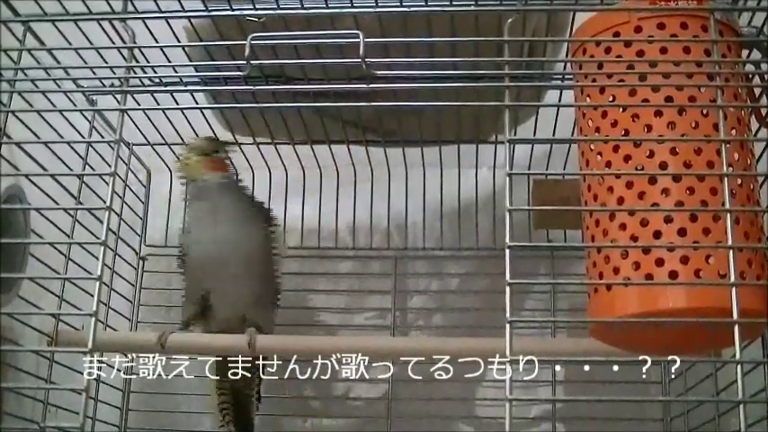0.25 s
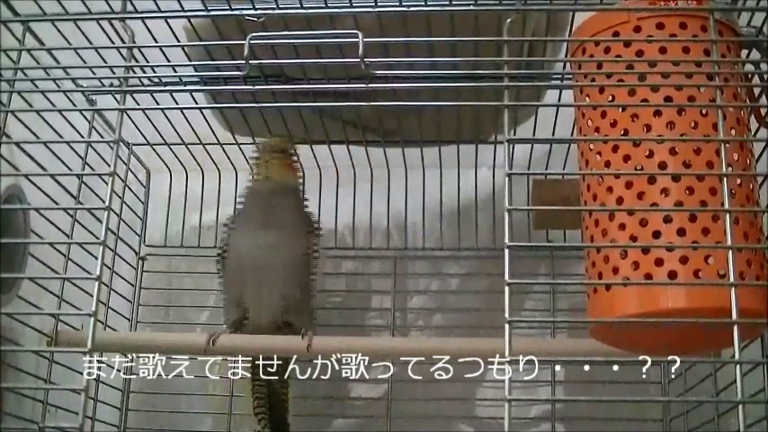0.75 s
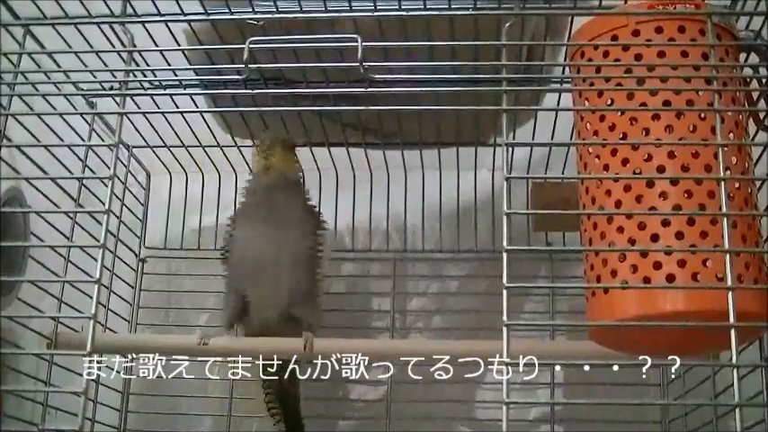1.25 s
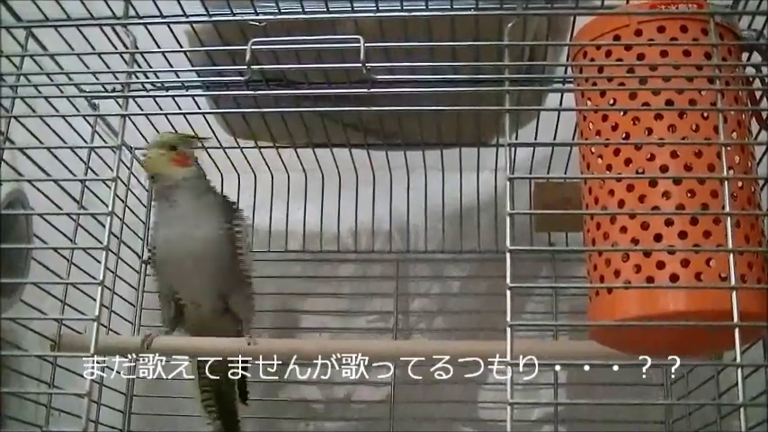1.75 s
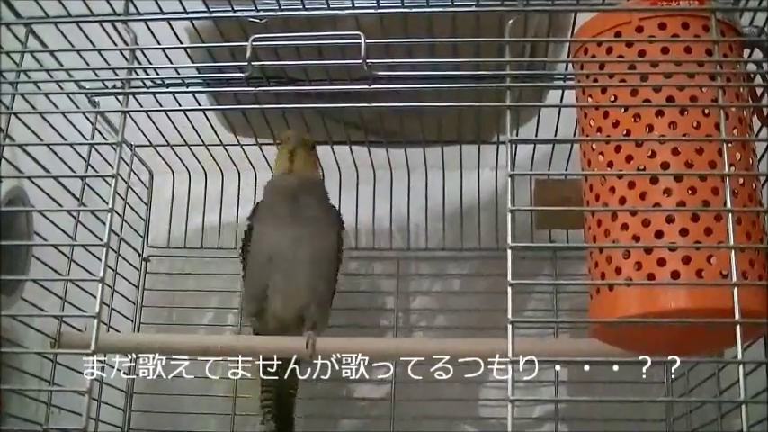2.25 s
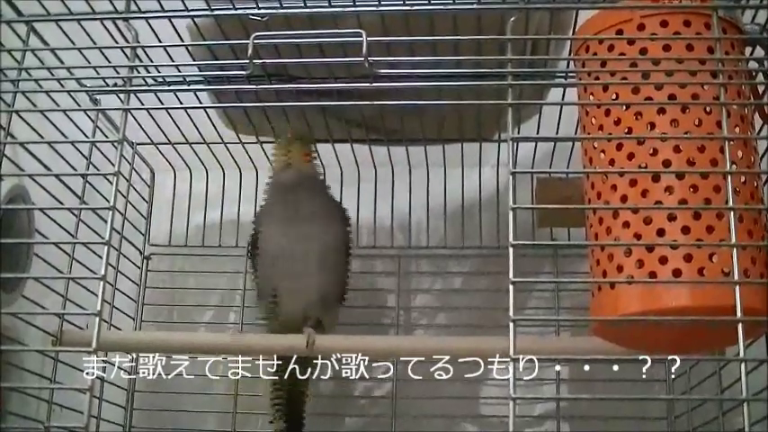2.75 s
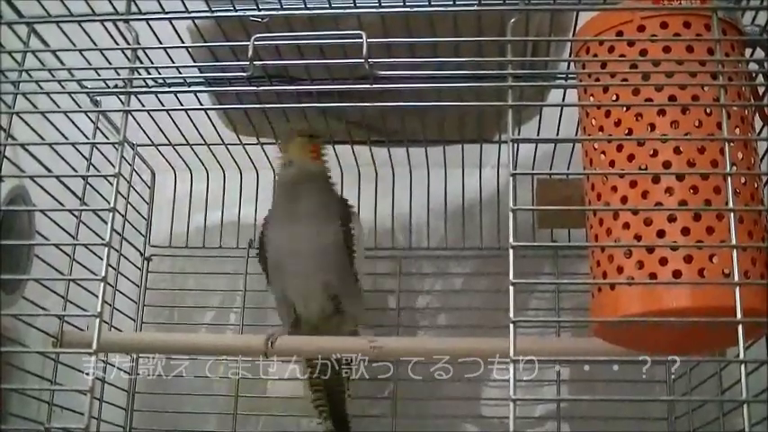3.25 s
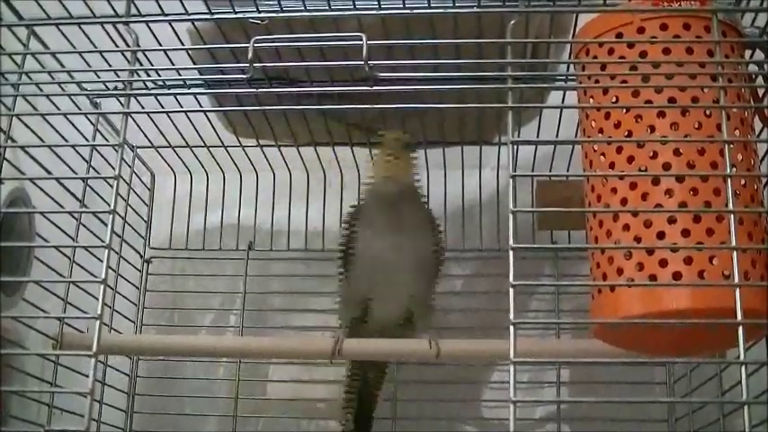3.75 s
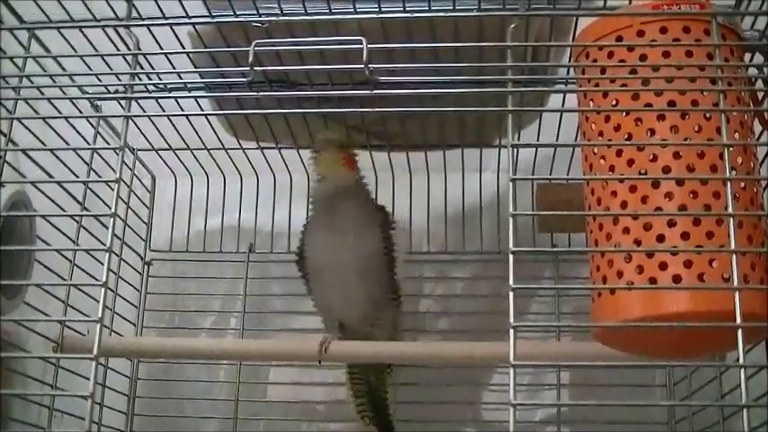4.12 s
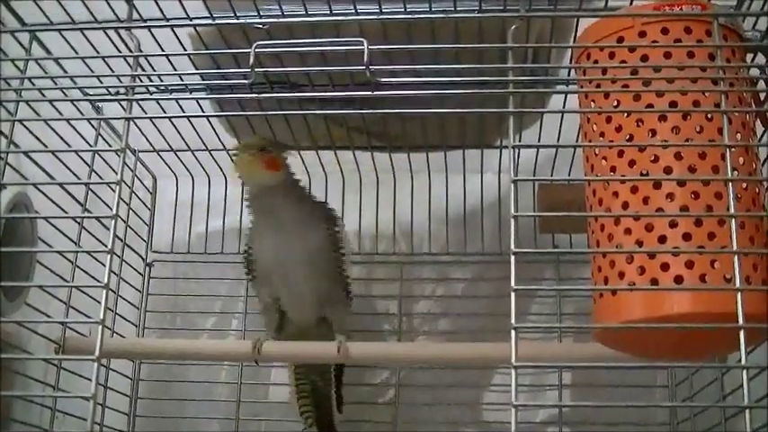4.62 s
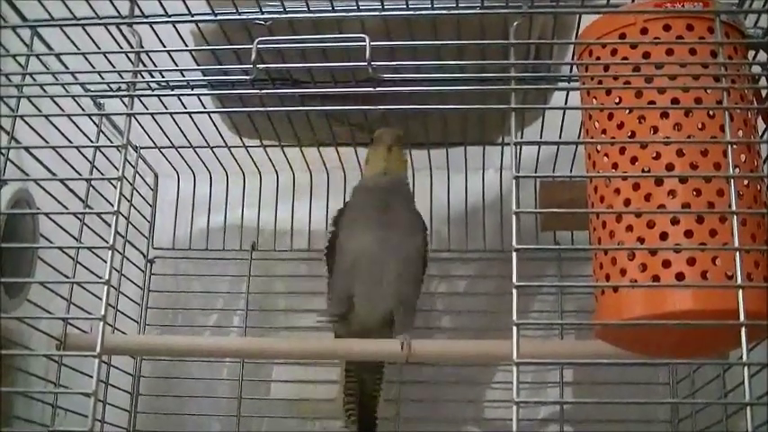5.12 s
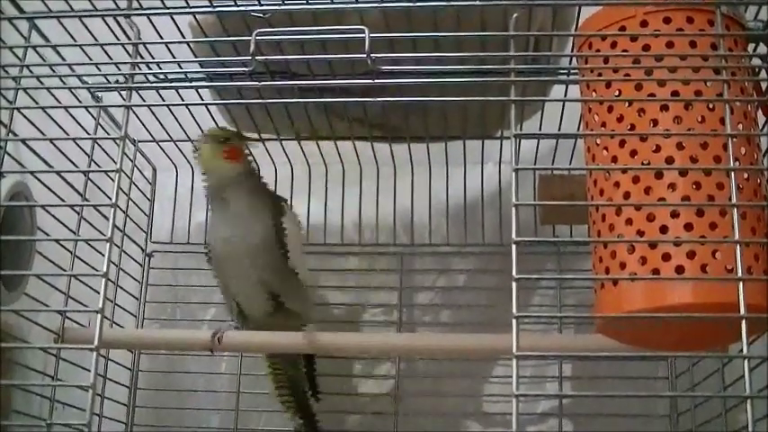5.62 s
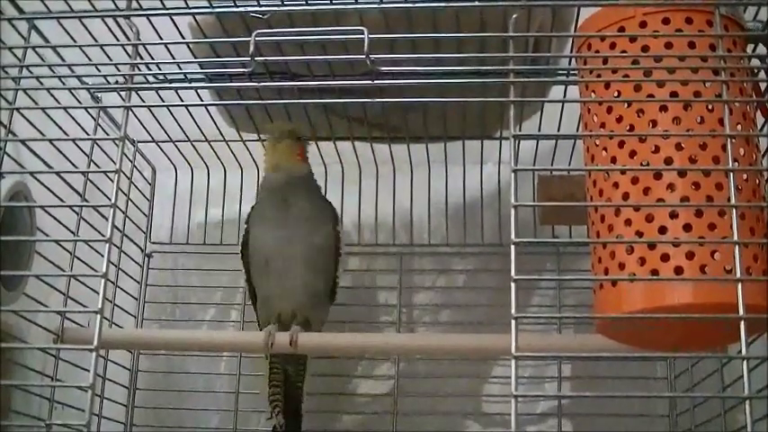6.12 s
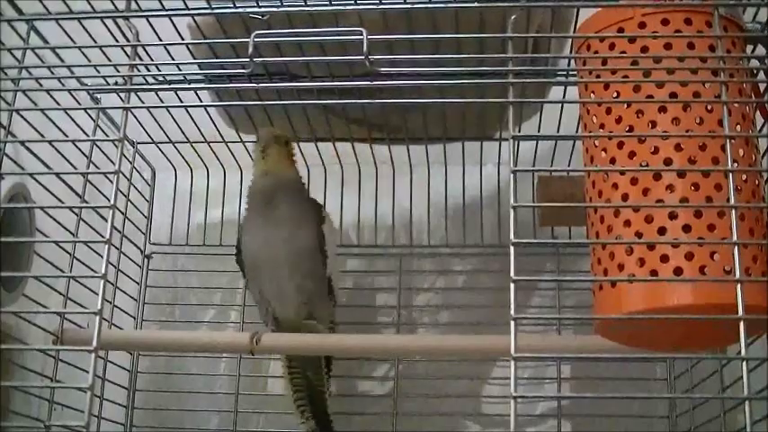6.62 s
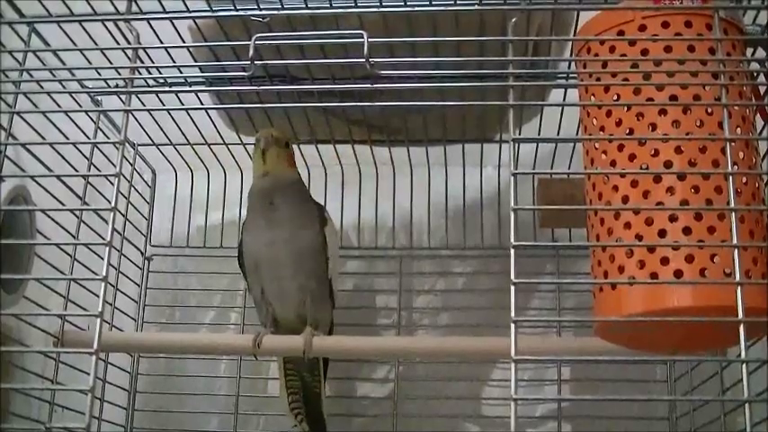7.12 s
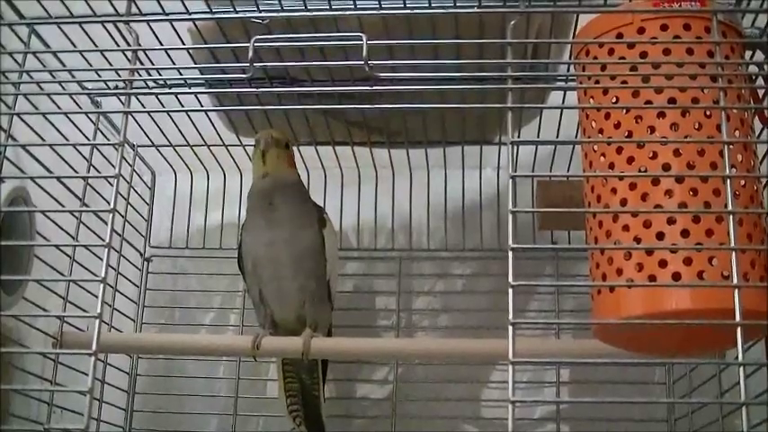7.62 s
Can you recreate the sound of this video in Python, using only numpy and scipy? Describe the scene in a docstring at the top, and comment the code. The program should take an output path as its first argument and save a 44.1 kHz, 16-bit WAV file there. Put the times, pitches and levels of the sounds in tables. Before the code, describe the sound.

A caged cockatiel whistles eleven short separate chirps at a little over two per second. The first scoops upward from low; the rest are brief, bright and slightly rough, climbing unevenly to a high, strong tenth before a somewhat lower last one. Quiet claw ticks come early and once between chirps. A distant fan hums low throughout. Nearby pickup, slightly left, in a small reflective room with a short ring.

```python
"""A distant fan rumbles and whines faintly as a bird's feet tick on the perch; then a cockatiel whistles
eleven short chirps, generally rising in pitch, in a small hard room.
Chirps are near-sines with weak overtones coloured by throat and beak, each ending in a quick fall.
Feet are decaying noise through a resonance; the fan is coloured noise plus narrow noise bands.
Close echoes and a diffuse tail make the room."""
import sys
import numpy as np
from scipy import signal
from scipy.io import wavfile

SR = 44100
rng = np.random.default_rng(int(sys.argv[2]) if len(sys.argv) > 2 else 0)


def volts_from_decibels(level):
    """Turn decibel levels (scalar or array-like) into linear amplitude factors."""
    exponent = np.asarray(level, float) / 20
    return 10 ** exponent


def to_wav(sig):
    """Store sig (one row per channel, or 1-D mono) as 16-bit WAV at the path in sys.argv[1].

    Samples outside -1..1 are clipped; the rate is SR.
    """
    pcm = np.clip(np.atleast_2d(sig), -1, 1) * 32767
    pcm = np.round(pcm).astype(np.int16)
    wavfile.write(sys.argv[1], SR, pcm.T)  # frames by channels


N = 347177


def cockatiel():
    """Places each syringeal chirp at its own moment."""
    # tune of each chirp between attack and fall: time_s, pitch_hz, whistle_rms_db
    tunes = [
        [(1.878, 1172, -41.5), (1.9, 1438, -32.5), (1.925, 1525, -35), (1.95, 1759, -20), (1.97, 1904, -23),
         (1.99, 2023, -21), (2.04, 1987, -12.5), (2.07, 1902, -12), (2.1, 1913, -27.5), (2.115, 1935, -18.5)],
        [(2.407, 2260, -34), (2.42, 2407, -29), (2.43, 2223, -18.5), (2.445, 2180, -10.5), (2.48, 2079, -9),
         (2.518, 2086, -22.5)],
        [(2.816, 2350, -30), (2.828, 2194, -20), (2.85, 2030, -9), (2.866, 1947, -16), (2.91, 1917, -12.5),
         (2.947, 1934, -23)],
        [(3.218, 2513, -22), (3.224, 2505, -24.5), (3.228, 2470, -13.5), (3.246, 2425, -15.5),
         (3.258, 2530, -24.5), (3.273, 2437, -29.5)],
        [(3.661, 1970, -27), (3.672, 2046, -22.5), (3.685, 2089, -14), (3.7, 2012, -15.5), (3.718, 1975, -23.5),
         (3.748, 1995, -11.5), (3.765, 1935, -15), (3.785, 1924, -26.5), (3.798, 1982, -18.5)],
        [(4.118, 2570, -37), (4.134, 2620, -30), (4.153, 2515, -32.5), (4.16, 2531, -12), (4.181, 2565, -39.5),
         (4.19, 2641, -18.5), (4.204, 2616, -29), (4.222, 2617, -22.5), (4.234, 2480, -23.5),
         (4.239, 2447, -13), (4.247, 2380, -15), (4.251, 2207, -19.5), (4.27, 2047, -17.5), (4.284, 1604, -31)],
        [(4.507, 2562, -29), (4.524, 2588, -17.5), (4.532, 2473, -22.5), (4.565, 2457, -15),
         (4.597, 2537, -20.5), (4.628, 2579, -12.5), (4.647, 2492, -18.5), (4.652, 2000, -28)],
        [(4.915, 2455, -29), (4.926, 2436, -16), (4.945, 2382, -20), (4.98, 2429, -15.5), (5.003, 2383, -14),
         (5.028, 2369, -16.5), (5.037, 2230, -15.5), (5.048, 2113, -16.5), (5.062, 1800, -29.5)],
        [(5.291, 2394, -22), (5.306, 2420, -17.5), (5.332, 2370, -15), (5.345, 2484, -18), (5.36, 2592, -16.5),
         (5.377, 2730, -11), (5.395, 2607, -25), (5.404, 2393, -24)],
        [(5.708, 2370, -35), (5.73, 2455, -20.5), (5.748, 2410, -17.5), (5.77, 2557, -18.5), (5.806, 2741, -13),
         (5.83, 2723, -8.5), (5.848, 2700, -21), (5.866, 2643, -7), (5.904, 2558, -13.5), (5.91, 2000, -29)],
        [(6.187, 2220, -28.5), (6.2, 2350, -23), (6.225, 2320, -26.5), (6.25, 2418, -13.5),
         (6.265, 2467, -25.5), (6.285, 2523, -17), (6.305, 2468, -16), (6.338, 2165, -21.5), (6.357, 2106, -18)],
    ]
    # beak opening of each chirp: overtone_onset_s, then overtone level against the throat colour:
    # start_db, middle_db, end_db; extra for the fourth multiple: fourth_db
    beaks = [(0.029, 13, 13.5, 3.5, 0.5), (.004, 5, -0.5, -1.5, -1), (.004, 3, -0.5, 2, 3),
             (.008, -5, 2, 6, -4.5), (.008, -11, 6.5, -2, 1.5), (.004, 5, 2.5, 5, -8.5),
             (0.012, -1.5, 4, -0.5, -3.5), (.008, -2, 2.5, 2.5, -6.5), (0.0037, -1, -2.5, -3.5, -3.5),
             (.006, 0.5, -3.5, -2.5, 3.5), (.006, 3.5, 0.5, 0.5, -3.5)]
    # end of each chirp's final dive: pitch_hz
    dives_hz = [1582, 1650, 1624, 2000, 1670, 1380, 1507, 1490, 2200, 1480, 1450]
    out = np.zeros(N)
    for tune, beak, dive_hz in zip(tunes, beaks, dives_hz):
        start, sound = chirp(tune, beak, dive_hz)
        out[start:start + len(sound)] += sound
    return out


def chirp(tune, beak, dive_hz):
    """The syrinx swings as a sine; overtones, half-pitch lines and turbulent air colour it."""
    waver_share, waver_hz, breath_db = 0.0059, 59.6, -30.5
    jitter_share = 0.17   # per unit of rasp
    t, pitch_hz, level_db, bright_db, dull_db = controls(tune, beak, dive_hz)
    pitch_hz, rasp = catch_whistle(t, pitch_hz)
    waver = waver_share * drift(waver_hz, len(t))
    jitter = jitter_share * rasp * drift(330, len(t))
    pitch_hz = pitch_hz * (1 + waver + jitter)
    phase = 2 * np.pi * np.cumsum(pitch_hz) / SR
    tone = np.sin(phase) + overtones(phase, pitch_hz, bright_db, dull_db, beak[-1])
    tone += half_pitch(t, phase)
    tone *= 1 + (volts_from_decibels(breath_db) + rasp) * drift(270, len(t))   # turbulent air shakes the amplitude
    return round(t[0] * SR), np.sqrt(2) * volts_from_decibels(level_db) * tone


def controls(tune, beak, dive_hz):
    """Adds scoop and dive to the tune; gives time, pitch, level, brightness and dulling per sample."""
    attack_s, scoop_share, fall_s, silent_db = 0.0041, 0.12, 0.01, -52
    bloom_s, pure_db = 0.004, -28
    steadiness = 0.17   # share of the whistle's level swing that overtones do not follow
    fall_dull_db, steep_hz_per_s = -5, 60000   # loss per overtone number at this fall rate or faster
    time_s, hz, db = np.transpose(tune)
    onset_s, *opening_db, _ = beak
    knots_s = np.r_[time_s.min() - attack_s, np.sort(time_s), time_s.max() + fall_s]
    t = np.arange(int(knots_s[0] * SR), int(knots_s[-1] * SR)) / SR
    pitch_hz = np.interp(t, knots_s, np.r_[hz[0] * (1 - scoop_share), hz, dive_hz])
    level_db = np.interp(t, knots_s, np.r_[silent_db, db, silent_db])

    opening_s = np.linspace(knots_s[0], knots_s[-1], len(opening_db))
    swing_db = np.interp(t, knots_s[1:-1], db) - db.mean()
    bright_db = np.interp(t, opening_s, opening_db) - steadiness * swing_db
    # nearly pure at first; overtones finish rising at onset_s
    bright_db += pure_db * np.clip((knots_s[0] + onset_s - t) / bloom_s, 0, 1)

    fall_hz_per_s = -np.gradient(pitch_hz) * SR
    dull_db = fall_dull_db * np.clip(fall_hz_per_s / steep_hz_per_s, 0, 1)
    return t, pitch_hz, level_db, bright_db, dull_db


def catch_whistle(t, pitch_hz):
    """Brief catches: the pitch sags and the tone roughens."""
    # catches in the whistle: time_s, pitch_sag_share, half_width_s, rasp_db (against the whistle)
    catches = [(1.979, .09, .004, -32), (2.0, .19, .0045, -24), (2.0205, .11, .004, -32),
               (3.2495, .22, .002, -22), (3.264, .22, .0035, -18), (4.158, .02, .005, -17),
               (4.59, .01, .005, -30), (4.957, .08, .003, -27), (4.972, .1, .004, -24),
               (6.236, .12, .005, -22)]
    rasp = np.zeros(len(t))
    for at_s, sag, half_width_s, rasp_db in catches:
        catch = bell(t, at_s, half_width_s)
        pitch_hz = pitch_hz * (1 - sag * catch)
        rasp += volts_from_decibels(rasp_db) * catch
    return pitch_hz, rasp


def overtones(phase, pitch_hz, bright_db, dull_db, fourth_db):
    """Multiples 2 to 12 of the pitch, filtered by throat and beak, each flickering in level."""
    # colour of throat and beak: freq_hz, level_db (against the whistle)
    throat = [(2400, -6.5), (3600, -11.5), (4300, -18), (5000, -28), (6000, -32), (7600, -31.5),
              (8200, -39), (9100, -48.5), (10200, -49.5), (11500, -41.5), (13000, -42.5), (14800, -30),
              (16000, -59)]
    # strength of each multiple on top of the throat colour: multiple, level_db
    orders = [(2, -0.8), (3, 0.14), (4, 2), (5, 5.5), (6, -3.5), (7, -7.5), (12, -10)]
    out = np.zeros(len(phase))
    for k in range(2, 13):
        db = log_interp(throat, k * pitch_hz) + log_interp(orders, k)
        db = db + bright_db + (k - 2) * dull_db + flicker_db(len(phase))
        if k == 4:
            db = db + fourth_db
        audible = k * pitch_hz < 0.4 * SR
        out += volts_from_decibels(db) * audible * np.sin(k * phase)
    return out


def half_pitch(t, phase):
    """Strong and weak cycles alternate, giving lines at odd multiples of half the pitch."""
    # spells of uneven cycles: time_s, half_width_s, half_pitch_db (against the whistle)
    doublings = [(1.896, 0.0055, -15), (1.925, .015, -32), (1.999, .003, -27), (2.816, .004, -39.5),
                 (3.217, 0.003, -19.5), (3.26, 0.0075, -34.5), (3.657, .003, -27), (4.12, 0.0072, -13),
                 (4.17, .035, -26), (4.506, 0.0078, -17), (4.652, 0.00164, -27.5), (4.913, 0.0046, -23.5),
                 (5.708, 0.0091, -24), (5.912, 0.002, -18.5), (6.365, 0.0074, -26.5)]
    # lines between the overtones: multiple, level_db (against the half-pitch level)
    half_lines = [(.5, -17.0), (1.5, 0.0), (2.5, -15), (3.5, -28), (4.5, -22.0)]
    half = volts_from_decibels(-54.5)   # floor outside the spells
    for at_s, half_width_s, db in doublings:
        half = half + volts_from_decibels(db) * bell(t, at_s, half_width_s)
    out = np.zeros(len(t))
    for multiple, db in half_lines:
        out += half * volts_from_decibels(db + flicker_db(len(t))) * np.sin(multiple * phase)
    return out


def flicker_db(size):
    """Slow random level of one overtone or half-pitch line."""
    return 2 * drift(70, size)


def feet():
    """Each step is a short scuff of claw on wood: decaying noise through a broad resonance."""
    # feet on the perch: start_s, peak_db, ring_hz, noise_t60_s
    steps = [(0.028, -48, 1370, 0.24), (.609, -55, 5100, 0.034), (3.919, -51, 5560, 0.035)]
    out, t = np.zeros(N), np.arange(SR // 6) / SR
    for start_s, peak_db, ring_hz, t60_s in steps:
        scuff = rng.standard_normal(len(t)) * volts_from_decibels(-60 * t / t60_s)
        tick = resonance(scuff, ring_hz, width_hz=1200)
        start = int(start_s * SR)
        out[start:start + len(t)] += volts_from_decibels(peak_db) * tick / np.abs(tick).max()
    return out


def room(x):
    """Direct sound, a few close echoes, and a diffuse tail that dies band by band."""
    # reflections from nearby surfaces: delay_s, left_db, right_db
    echoes = [(.0017, -9.5, -19), (.0043, -11.5, -18), (.0079, -12, -9.5), (0.0117, -8.5, -13),
              (0.018, -27, -20), (.0236, -22, -21.5)]
    # decay time of the tail: freq_hz, t60_s
    decay = [(1000, .34), (2500, 0.25), (6000, 0.24), (14000, 0.15)]
    tail_db, side_db, onset_s = -7.5, -16.5, 0.0064   # side_db is against the mid
    t = np.arange(SR // 2) / SR
    tail = 0
    for hz, noise in octave_bands(rng.standard_normal((2, 2, len(t))), steps=2):
        t60_s = log_interp(decay, hz)
        unit_energy = np.sqrt(6 * np.log(10) / (t60_s * SR))
        tail = tail + noise * volts_from_decibels(-60 * t / t60_s) * unit_energy
    mid, side = tail * (1 - np.exp(-t / onset_s))
    response = volts_from_decibels(tail_db) * (mid + volts_from_decibels(side_db) * side * [[1], [-1]])
    response[:, 0] += 1
    for delay_s, left_db, right_db in echoes:
        response[:, int(delay_s * SR)] += volts_from_decibels([left_db, right_db])
    return signal.fftconvolve(x[None], response, axes=1)[:, :N]


def fan():
    """Steady coloured noise, nearly alike left and right, with narrow wavering noise tones."""
    # relative spectrum of the broadband noise: freq_hz, density_db (per Hz)
    spectrum = [(12, -55), (20, -18), (47, -25), (66, -9), (133, -6), (202, 0), (282, -2), (748, -15.5),
                (885, -13), (989, -14.5), (3010, -21), (3980, -27), (4580, -25.5), (14000, -34),
                (15600, -48)]
    # left-right correlation of the broadband noise: freq_hz, likeness (0 to 1)
    likeness = [(60, 0.82), (180, 1), (550, 0.94), (1650, 0.86), (4970, 0.6), (15000, 1.0)]
    # unsteady tones: freq_hz, width_hz (of each of two cascaded peaks), rms_db
    tones = [(78.86, 5, -70.5), (162.2, 11, -68.5), (198.6, 20, -64), (251, 3.9, -68.5), (344, 10, -80.5),
             (734, 140, -72.5), (1732, 48, -76), (2990, 470, -73.5), (4480, 210, -74.5), (4800, 130, -78.5),
             (5140, 150, -78), (6040, 180, -81.5), (10500, 90, -95.5)]
    noise = 0
    for hz, (mid, side) in octave_bands(rng.standard_normal((2, 2, N)), steps=3):
        alike = np.clip(log_interp(likeness, hz), 0, 1)
        stereo = np.sqrt(1 + alike) * mid + np.sqrt(1 - alike) * side * [[1], [-1]]
        noise = noise + volts_from_decibels(log_interp(spectrum, hz)) * stereo
    out = volts_from_decibels(-57.5) * rms_one(noise)
    white = rng.standard_normal(N)
    for hz, width_hz, db in tones:
        tone = resonance(resonance(white, hz, width_hz), hz, width_hz)
        out = out + volts_from_decibels(db) * rms_one(tone)
    return out


def bell(t, at_s, half_width_s):
    """A smooth Gaussian hump of height 1."""
    return np.exp(-0.5 * ((t - at_s) / half_width_s) ** 2)


def rms_one(x):
    """Scales to unit rms."""
    return x / np.sqrt(np.mean(x ** 2) + 1e-20)


def log_interp(points, x):
    """Reads a two-column table on a logarithmic axis."""
    xs, ys = np.transpose(points)
    return np.interp(np.log(x), np.log(xs), ys)


def drift(rate_hz, size):
    """White noise twice through a one-pole low-pass, near unit rms."""
    r = np.exp(-2 * np.pi * rate_hz / SR)
    settle = 4000
    slow = signal.lfilter([1], [1, -2 * r, r * r], rng.standard_normal(size + settle))
    return rms_one(slow[settle:])


def resonance(x, hz, width_hz):
    """A two-pole peak of gain about 1."""
    r = np.exp(-np.pi * width_hz / SR)
    poles = [1, -2 * r * np.cos(2 * np.pi * hz / SR), r * r]
    return signal.lfilter([(1 - r * r) / 2, 0, (r * r - 1) / 2], poles, x)


def octave_bands(white, steps):
    """Centre and noise of each 1/steps octave band; neighbours take unrelated noise."""
    edges_hz = 20 * 2 ** (np.arange(10 * steps) / steps)
    for k, (low, high) in enumerate(zip(edges_hz, edges_hz[1:])):
        band = signal.butter(2, [low, high], "band", fs=SR, output="sos")
        yield np.sqrt(low * high), signal.sosfilt(band, white[k % 2])


def limiter(x):
    """Gain falls quickly where the level passes the limit, and recovers at a steady rate."""
    limit_db, attack_s, release_db_per_s = -11, 0.001, 200
    peak_db = 20 * np.log10(np.abs(x).max(axis=0) + 1e-9)
    over_db = np.maximum(peak_db - limit_db, 0)
    ramp_db = release_db_per_s * np.arange(N) / SR
    held_db = np.maximum.accumulate(over_db + ramp_db) - ramp_db
    r = np.exp(-1 / (attack_s * SR))
    return x * volts_from_decibels(-signal.lfilter([1 - r], [1, -r], held_db))


def scene():
    """The bird and its feet, slightly left, in the room over the fan."""
    pan_db = 1.05   # left over right
    bird = room(cockatiel() + feet()) * volts_from_decibels([[pan_db / 2], [-pan_db / 2]])
    return bird + fan()


def top_cut(x):
    """Nothing passes above the cut-off."""
    return signal.sosfilt(signal.butter(12, 15750, fs=SR, output="sos"), x)


def record(dry):
    """A fast limiter, then a steep treble cut."""
    low_pass = signal.cheby2(12, 60, 15750, fs=SR, output="sos")   # 60 dB down from 15750 Hz
    mix = signal.sosfilt(low_pass, limiter(dry))
    return top_cut(mix)


dry = scene()
out = record(dry)
to_wav(out)
```